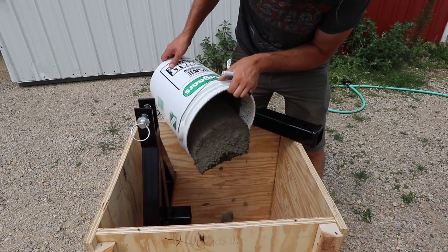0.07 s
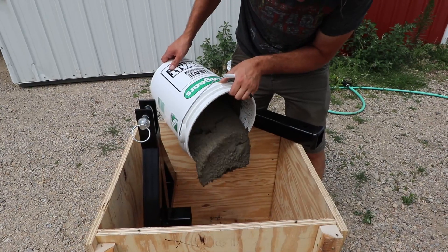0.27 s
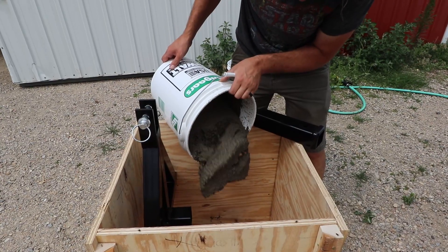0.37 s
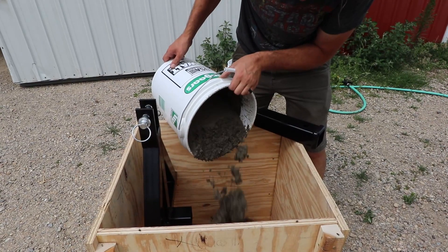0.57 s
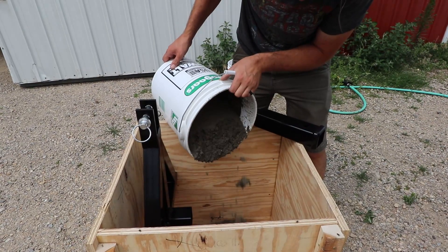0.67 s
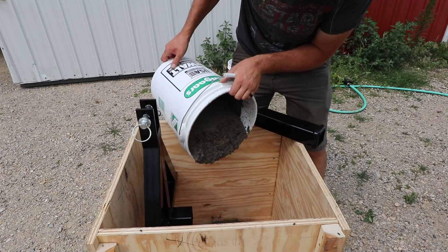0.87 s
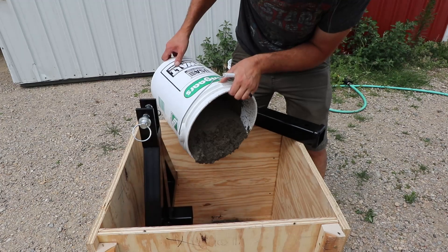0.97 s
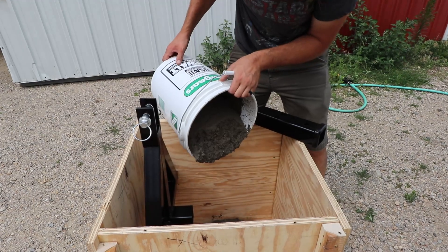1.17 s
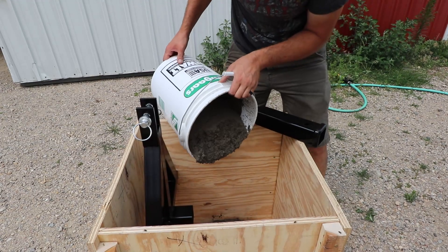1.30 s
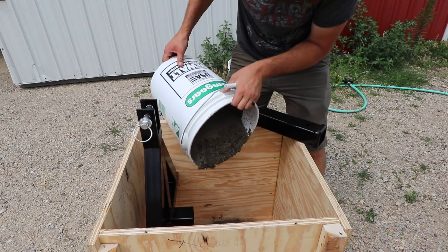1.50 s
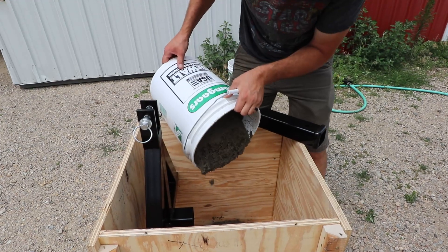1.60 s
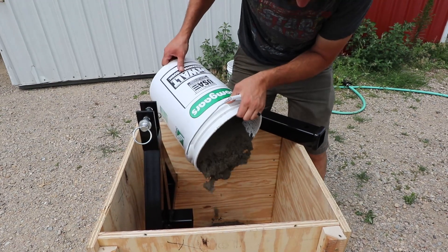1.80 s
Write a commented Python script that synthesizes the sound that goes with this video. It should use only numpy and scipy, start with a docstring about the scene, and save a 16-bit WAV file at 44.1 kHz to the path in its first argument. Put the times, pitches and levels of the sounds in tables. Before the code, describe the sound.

Wet concrete slides grittily out of a plastic bucket, close by. A small lump splats into a plywood box, then a bigger one thuds down with pattering crumbs. After a lull the scraping resumes, over a faint outdoor hum.

```python
"""Wet concrete slides out of a plastic bucket and drops in lumps into a plywood box, outdoors.
Sand scrapes along the bucket wall; each lump splats, thumps the boards and sets the box booming.
Single stones tick, wet grains crackle apart, and crumbs patter down after the biggest lump.
Behind it a distant machine hums, a light breeze rumbles and small birds chirp."""
import sys
import numpy as np
from scipy import signal
from scipy.fft import rfft, irfft
from scipy.io import wavfile

SR = 44100
rng = np.random.default_rng(int(sys.argv[2]) if len(sys.argv) > 2 else 0)


def master_out(mix):
    """Clip the mix to full scale and print it as 16-bit PCM to the path in sys.argv[1]."""
    frames = np.transpose(np.atleast_2d(mix))
    ceiling = np.clip(frames, -1, 1)
    pcm = np.round(ceiling * 32767).astype(np.int16)
    wavfile.write(sys.argv[1], SR, pcm)


N = 81585

# Tone of the open air. Each row: frequency in Hz, relative gain in dB.
AIR_EQ = [(25, -9), (50, -16), (85, 0), (110, 15), (170, 10), (290, 10), (400, 3), (520, -3), (680, 0),
          (1000, -3), (2000, -8.5), (3500, -11), (5000, -17.5), (9000, -28), (16000, -31)]
# Partials of the distant machine. Each row: pitch in Hz, pitch waver in Hz, level in dB.
HUM_PARTIALS = [(68.9, 5.2, -46.5), (116.95, 4.38, -42.5), (164.5, 10.3, -49.5), (205.5, 8.3, -48),
                (247.6, 12, -47.5)]
# Far birds, blurred by distance. Each row: start in seconds, level in dB, centre in Hz,
# decay in seconds.
FAR_CALLS = [(1.275, -40.5, 3760, .035), (1.365, -41.5, 3250, 0.16)]
# Notes of the nearer bird. Each row: start and length in seconds, first and last pitch in Hz,
# relative level in dB.
BIRD_NOTES = [(1.325, 0.029, 3830, 3600, -51), (1.347, 0.029, 3600, 3200, -42),
              (1.412, 0.018, 2420, 2540, -54.5), (1.626, 0.029, 4030, 4670, -50)]
# Air resonances of bucket and box. Each row: centre in Hz, width in Hz, boost in dB.
CAVITY_MODES = [(653, 44, 6), (1215, 250, 2), (1672, 98, 4), (3560, 650, 2.5), (4260, 400, 2.5)]
# Mix sliding over the bucket wall. Each row: time in seconds, relative level in dB, extra treble in dB.
SLIDE_ENVELOPE = [(0, -34, -1), (.05, -37, -2.5), (.17, -37, -10), (.25, -34.5, 3), (.31, -33.5, -2.5),
                  (.38, -31.5, 4.5), (.44, -33.5, 4), (.475, -32.5, 2.5), (.56, -33.5, 4), (.58, -43, 4.5),
                  (.63, -52.5, 11), (.71, -57.5, 7), (1.1, -61, -10), (1.61, -46, -4.5), (1.70, -35, -7),
                  (1.81, -31, -6.5), (1.85, -30.5, -5.5)]
# Tone of the scrape. Each row: frequency in Hz, relative gain in dB.
SLIDE_EQ = [(120, -20), (300, -1), (500, -14.5), (660, 1), (950, 0.5), (1400, 1), (3500, -1.5), (5200, -5),
            (8000, -7.5), (11000, -13), (16000, -27.5)]
# Loose mix showering into the box. Each row: time in seconds, relative level in dB.
SHOWER_ENVELOPE = [(.725, -51), (.738, -31), (.762, -30.5), (.79, -29.5), (.83, -26.5), (.87, -27),
                   (.90, -24.5), (.925, -30.5), (.955, -30), (.985, -36.5), (1.035, -39), (1.09, -46),
                   (1.2, -55)]
# Tone of the falling crumbs. Each row: frequency in Hz, relative gain in dB.
SHOWER_EQ = [(80, -4), (200, 12), (420, 3), (900, 2), (1300, 5), (2500, 4), (4000, 0), (5500, -2.5),
             (8000, -6.5), (11000, -11), (16000, -22)]
# Stones knocking and air pockets squelching. Each row: start in seconds, relative level in dB,
# pitch in Hz, decay in seconds, sharpness as Q.
STONE_HITS = [(0.2, -31.5, 800, 0.014, 3), (0.224, -18, 830, 0.0065, 1.9),
              (0.3222, -28.5, 3570, 0.015, 0.66), (0.3504, -18.5, 2280, 0.0033, 0.51),
              (0.3863, -16, 3150, 0.0057, 0.74), (0.392, -22.5, 1730, .022, 3),
              (0.402, -26.5, 1200, 0.011, 1.9), (0.422, -20, 1890, 0.0044, 0.87),
              (0.7235, -10, 566, 0.0084, 6.1), (0.7809, -15, 3800, .0008, 1.2),
              (0.962, -26, 680, 0.018, 8.9), (1.0278, -24.5, 1620, 0.0044, 1.7),
              (1.4598, -32, 796, 0.0071, 1.5)]
# The box booming under the load. Each row: start in seconds, level in dB, pitch in Hz, decay in seconds.
BOX_BOOMS = [(0.724, -27.5, 107.7, 0.058), (0.80, -22.5, 100.8, .06), (0.886, -32, 83, .05),
             (0.954, -30.5, 69.4, 0.075), (1.466, -26, 98, 0.02)]
# Modes of the plywood. Each row: pitch in Hz, relative level in dB, time to fade 60 dB in seconds.
BOARD_MODES = [(221.5, -5.5, 0.072), (261, 4, 0.032), (330.8, -5.5, 0.12), (443, -7, 0.046),
               (499, -3.5, 0.037), (563, -3.5, .028), (639, -15, 0.1), (692, -18, 0.059), (888, -26, 0.094),
               (1115, -5, 0.029)]
# Lumps hitting the boards. Each row: start in seconds, relative level in dB, contact time in
# milliseconds, then the ratios that scale the modes' pitch and ring time.
LUMP_HITS = [(0.2286, -8, 0.15, 1.08, 1.2), (0.2313, -4.5, 1.6, 1.12, 1.1),
             (0.2899, -16.5, 1.04, 0.92, 2.4), (0.7231, -3, 0.22, 0.974, 0.54),
             (0.727, -0.5, .28, 1.06, 0.27), (0.7313, -1.5, 0.71, 0.9, 0.26), (0.802, -10, 1.12, 1.2, 1.3),
             (0.886, -19.5, 0.47, 1.1, 0.83), (0.9614, -21, 0.23, 1.19, 1.8),
             (1.4611, -21, 0.42, 1.0, 0.36), (1.4695, -14.5, 1.7, 1.05, 1.3)]
# Wet mix bursting on the boards. Each row: start in seconds, relative level in dB, attack and decay
# in seconds, treble tilt in dB per octave.
SPLAT_HITS = [(0.184, -28, 0.003, 0.0045, -1), (0.198, -39, 0.0065, .008, -6.5),
              (0.2123, -13, 0.009, 0.0044, -1.5), (0.2247, -14.5, 0.0037, 0.0057, -4),
              (0.258, -40, .003, 0.0033, 8), (0.275, -31.5, 0.0097, 0.0078, 4),
              (0.7192, -7, 0.0041, 0.0052, -0.5), (0.792, -20.5, 0.0044, .013, -0.5),
              (0.879, -19.5, 0.0065, 0.0068, 0), (0.957, -21, 0.0013, 0.0023, 6),
              (0.962, -20, 0.0015, 0.005, -0.5), (1, -34, 0.0028, 0.0096, 0.5),
              (1.016, -35, 0.0014, .007, 0), (1.194, -37.5, 0.0043, 0.0046, -2)]
# Tone of the wet spray. Each row: frequency in Hz, relative gain in dB.
SPLAT_EQ = [(150, 2.5), (400, 8.5), (750, 2), (1100, -4.5), (2400, 0.5), (3600, 3.5), (5500, 1), (8000, -1),
            (12000, -10), (16000, -13)]

TIME = np.arange(N) / SR
FREQS = np.arange(N + 1) * SR / (2 * N) + 1e-3  # Hz, the axis every filter is drawn on


def undb(db):
    """Decibels to gain."""
    return 10 ** (np.asarray(db) / 20)


def unit(x):
    """Scale to rms 1."""
    return x / np.sqrt(np.mean(x ** 2) + 1e-18)


def shape(x, gain):
    """Filter by a gain for each frequency."""
    return irfft(rfft(x, 2 * N) * gain)[..., :N]


def noise(gain):
    """Two unrelated channels of filtered noise at rms 1."""
    return unit(shape(rng.standard_normal((2, N)), gain))


def eq(points):
    """EQ curve through (Hz, dB) points."""
    hz, db = np.array(points).T
    return undb(np.interp(np.log(FREQS), np.log(hz), db))


def resonance(hz, width_hz):
    """Band-pass response of one resonator."""
    return 1 / (1 + 1j * (FREQS ** 2 - hz ** 2) / (FREQS * width_hz))


def fader(points, column=1):
    """Gain ride through rows of a time in seconds and levels in dB."""
    points = np.array(points)
    return undb(np.interp(TIME, points[:, 0], points[:, column]))


def burst(start, attack_s, decay_s):
    """Envelope that swells, then dies away."""
    age = TIME - start
    return np.clip(age / attack_s, 0, 1) ** 1.8 * np.exp(-np.maximum(age - attack_s, 0) / decay_s)


def wander(cutoff_hz):
    """Slow random drift at rms 1."""
    return unit(shape(rng.standard_normal(N), 1 / (1 + (FREQS / cutoff_hz) ** 4)))


def spread(pair, width=0.83, wide_above_hz=2840, pan_db=-0.5):
    """Treat two signals as mid and side: centred bass, wide treble."""
    mid, side = pair
    side = shape(side, width * FREQS / np.hypot(FREQS, wide_above_hz))
    return np.array([mid + side, mid - side]) * undb([[pan_db / 2], [-pan_db / 2]])


def reverb(x, t60_s, wet_db, low_cut_hz=900):
    """Add a diffuse stereo tail that leaves the bass nearly dry."""
    tail = shape(rng.standard_normal((2, N)), FREQS / np.hypot(FREQS, low_cut_hz))
    tail *= undb(-60 * TIME / t60_s)
    return x + undb(wet_db) * shape(x, rfft(unit(tail), 2 * N) / np.sqrt(N))


def grit(per_s, scatter_db, tone):
    """Clicks of sand and gravel, uneven in size, ringing the air in bucket and box."""
    fires = rng.random((2, N)) < per_s / SR
    size = np.minimum(rng.exponential(size=(2, N)), 5)
    clicks = fires * undb(scatter_db * size) * rng.choice([-1, 1], (2, N))
    cavity = 1 + sum((undb(db) - 1) * resonance(hz, width) for hz, width, db in CAVITY_MODES)
    return unit(shape(clicks, tone * cavity))


def breeze():
    """A light breeze rumbles faintly, unrelated left and right."""
    return undb(-47.5) * noise(resonance(hz=90, width_hz=180))


def open_air():
    """A soft, dark bed of outdoor air."""
    return spread(undb(-37.5) * noise(eq(AIR_EQ)))


def machine_hum(waver_rate_hz=11.72, waver_db=2.5):
    """A distant machine drones, each partial wavering in level and pitch."""
    hum = 0
    for hz, waver_hz, db in HUM_PARTIALS:
        level = np.sqrt(2) * undb(db + waver_db * wander(waver_rate_hz))
        pitch = hz + waver_hz * wander(waver_rate_hz)
        hum += level * np.sin(2 * np.pi * np.cumsum(pitch) / SR)
    return hum


def birds():
    """Short gliding whistles echo round the yard, over a blur of farther birds."""
    song, far = 0, 0
    for start, length, from_hz, to_hz, db in BIRD_NOTES:
        progress = np.clip((TIME - start) / length, 0, 1)
        pitch = from_hz + (to_hz - from_hz) * progress
        song += 2 * undb(db) * np.sin(np.pi * progress) * np.sin(2 * np.pi * np.cumsum(pitch) / SR)
    for start, db, hz, decay in FAR_CALLS:
        blur = noise(resonance(hz, width_hz=990) ** 2)
        far += undb(db) * burst(start, attack_s=0.016, decay_s=decay) * blur
    lean_left = undb([[1.5], [-1.5]])
    return reverb(song, t60_s=0.4, wet_db=-10) * lean_left + far


def wet_crackle():
    """Wet grains pull apart in sparse, bright ticks wherever the mix is moving."""
    motion = fader(SLIDE_ENVELOPE) + fader(SHOWER_ENVELOPE)
    ticks = grit(per_s=330, scatter_db=3, tone=resonance(hz=5570, width_hz=5570) ** 2)
    return undb(-13) * motion * ticks


def bucket_slide(treble_hz=2560, bucket_hz=216.6):
    """Sand scrapes the bucket and stirs its hollow note, brighter while spilling over the lip."""
    scrape = grit(per_s=12000, scatter_db=2, tone=eq(SLIDE_EQ))
    dull = shape(scrape, 1 / (1 + (FREQS / treble_hz) ** 2))
    hollow = undb(-5.5) * noise(resonance(bucket_hz, width_hz=10.5) * resonance(bucket_hz, bucket_hz))
    brightness = fader(SLIDE_ENVELOPE, column=2)  # rides the hollow note as well as the treble
    return fader(SLIDE_ENVELOPE) * (dull + brightness * (scrape - dull + hollow))


def crumb_shower():
    """Crumbs patter down behind the big lump."""
    return fader(SHOWER_ENVELOPE) * grit(per_s=6000, scatter_db=2.5, tone=eq(SHOWER_EQ))


def stones():
    """Each stone or air pocket ticks on first contact, then chatters around its own pitch."""
    out = 0
    for start, db, hz, decay, q in STONE_HITS:
        grains = grit(per_s=13000, scatter_db=-0.5, tone=resonance(hz, hz / q) * resonance(hz, 2 * hz))
        chatter = burst(start, attack_s=0.00072, decay_s=decay) * grains
        tick = burst(start, attack_s=1 / hz, decay_s=0.00055) * np.sin(2 * np.pi * hz * (TIME - start))
        out += undb(db) * (spread(chatter) + undb(-2.5) * tick)
    return out


def box_booms(attack_s=0.0072):
    """The deep note of the whole box, lower while the weight piles on."""
    return sum(undb(db) * burst(start, attack_s, decay) * np.sin(2 * np.pi * hz * (TIME - start))
               for start, db, hz, decay in BOX_BOOMS)


def lump_thuds(radiate_hz=126):
    """Each lump pushes the boards away; a softer, longer contact favours the low modes."""
    age, jw, spectrum = TIME[:N // 2], 2j * np.pi * FREQS, 0
    for start, db, contact_ms, pitch, ring in LUMP_HITS:
        boards = sum(undb(level - 60 * age / (t60 * ring)) * np.cos(2 * np.pi * hz * pitch * age)
                     for hz, level, t60 in BOARD_MODES)
        delay = np.exp(-jw * start)
        softness = 1 / (1 + jw * contact_ms / 1000)
        spectrum -= undb(db) * rfft(boards, 2 * N) * delay * softness
    s = 1j * FREQS / radiate_hz
    low_cut = s * s / (s * s + np.sqrt(2) * s + 1)  # the boards radiate little deep bass
    return undb(-2.5) * irfft(spectrum * low_cut)[:N]


def lump_splats():
    """Each lump bursts into a short spray of wet grit."""
    spray = grit(per_s=18000, scatter_db=2, tone=eq(SPLAT_EQ))
    octaves = np.log2(np.clip(FREQS, 500, 9000) / 3000)  # the tilt pivots at 3 kHz
    return sum(undb(db) * burst(start, attack, decay) * shape(spray, undb(tilt * octaves))
               for start, db, attack, decay, tilt in SPLAT_HITS)


def scene():
    """The pour, up close, over the ambience of the yard."""
    concrete = spread(lump_splats() + bucket_slide() + crumb_shower() + wet_crackle()) + stones()
    in_box = undb(1.5) * reverb(concrete, t60_s=0.04, wet_db=-3.5)  # reflections between the boards
    pour = in_box + lump_thuds() + box_booms()
    return pour + birds() + machine_hum() + open_air() + breeze()


def record(dry, ceiling=0.83, top_hz=15600):
    """Soft-clip the loudest peaks and cut the very top."""
    rounded = dry / (1 + (dry / ceiling) ** 6) ** (1 / 6)
    return signal.sosfilt(signal.ellip(10, .2, 70, top_hz, fs=SR, output="sos"), rounded)


dry = scene()
out = record(dry)
master_out(out)
```